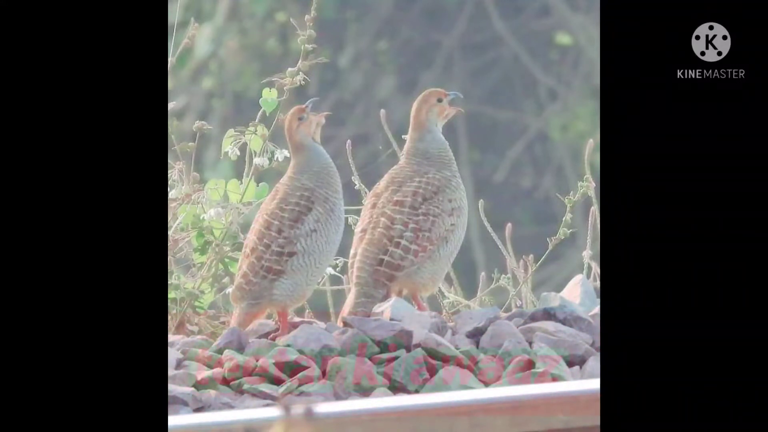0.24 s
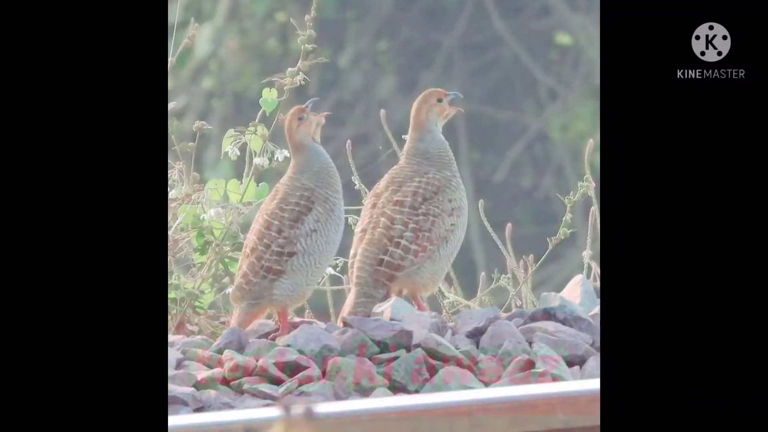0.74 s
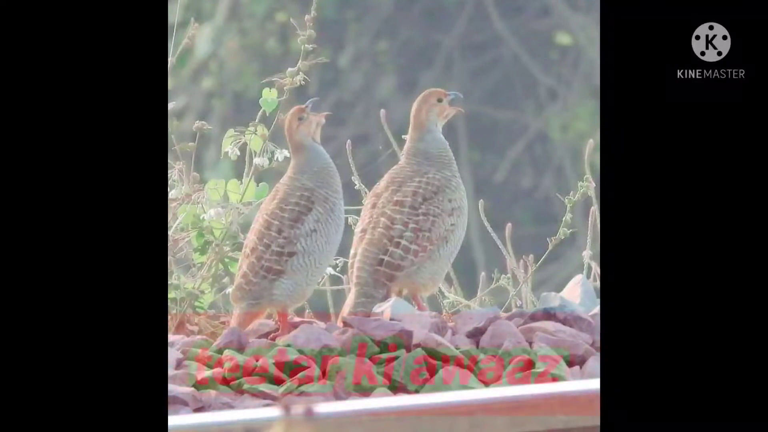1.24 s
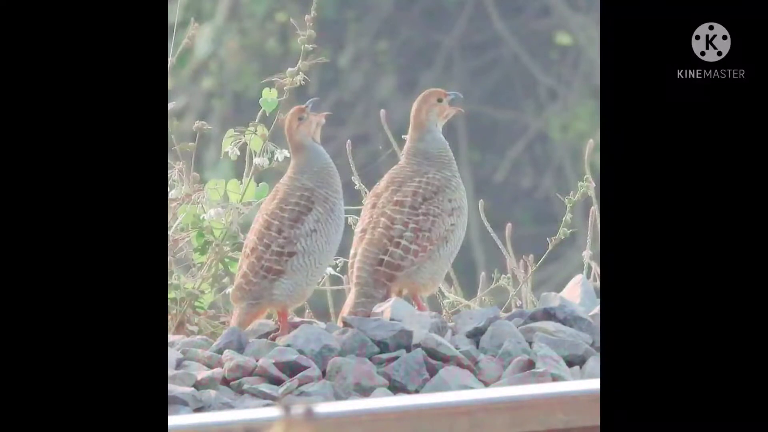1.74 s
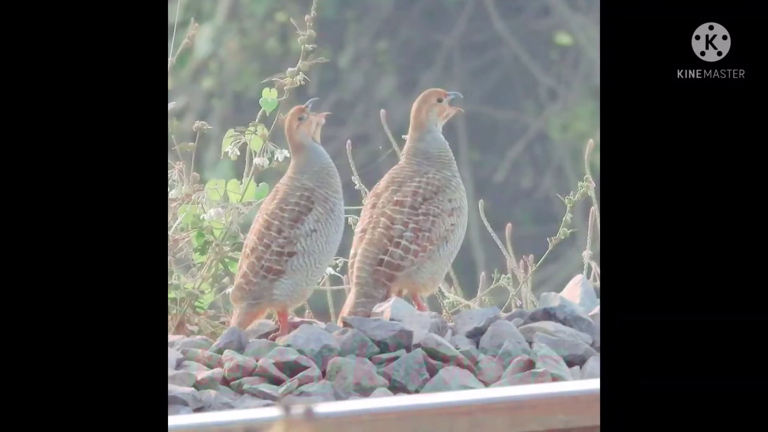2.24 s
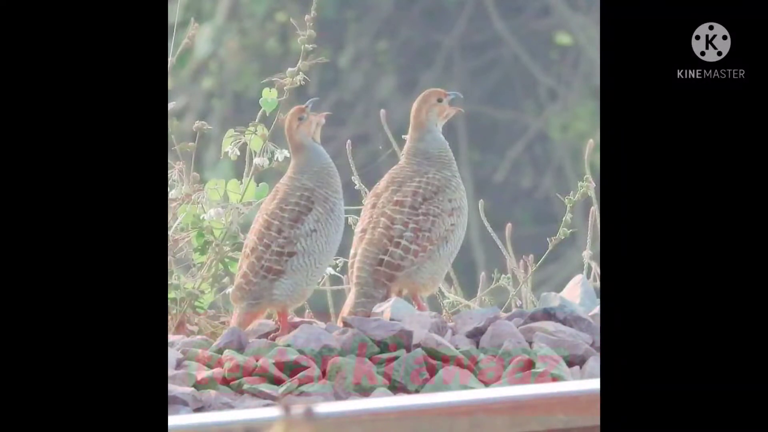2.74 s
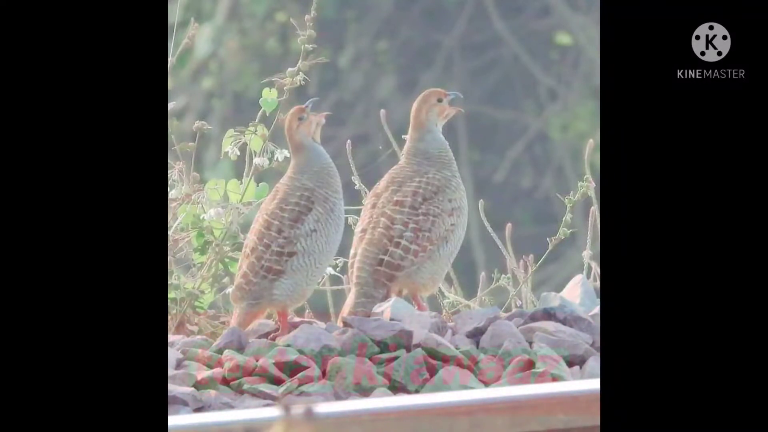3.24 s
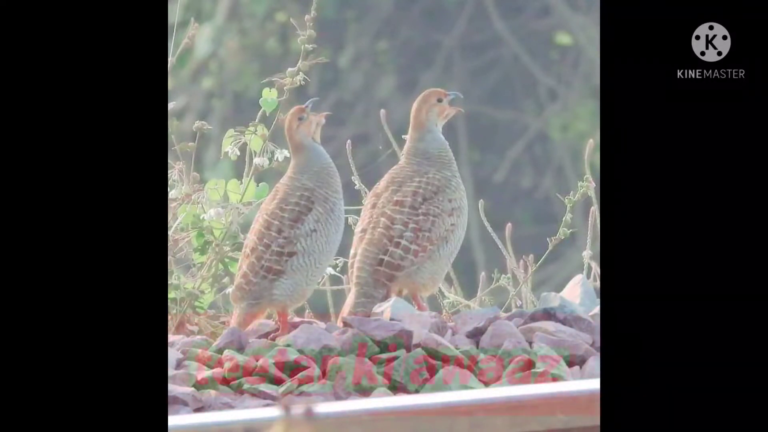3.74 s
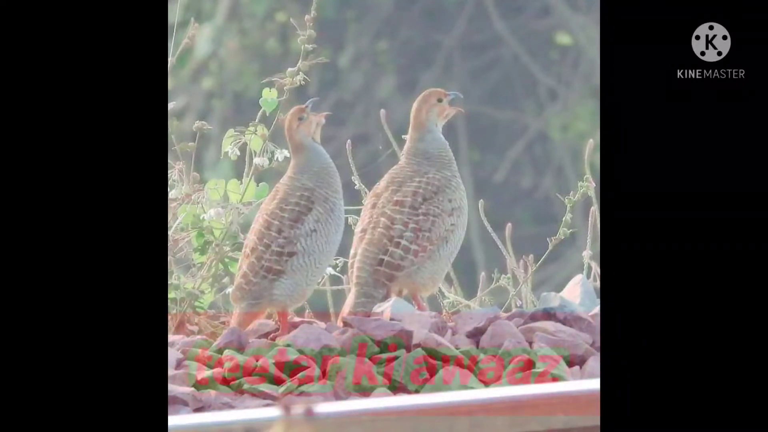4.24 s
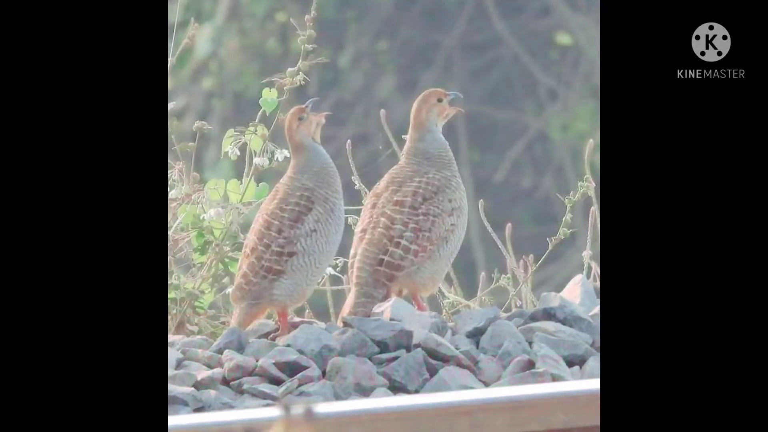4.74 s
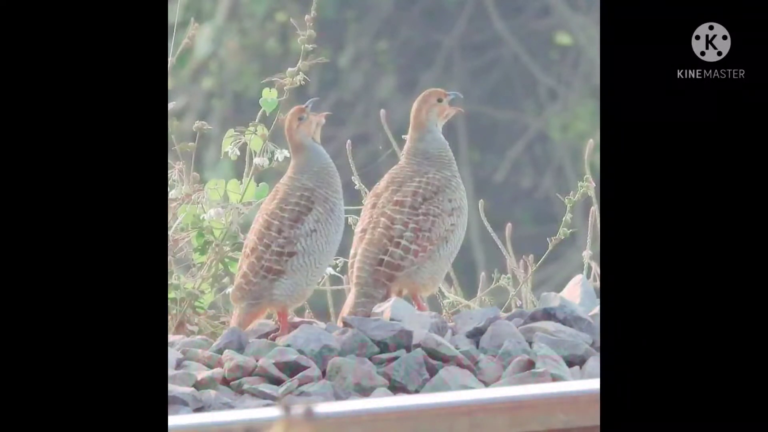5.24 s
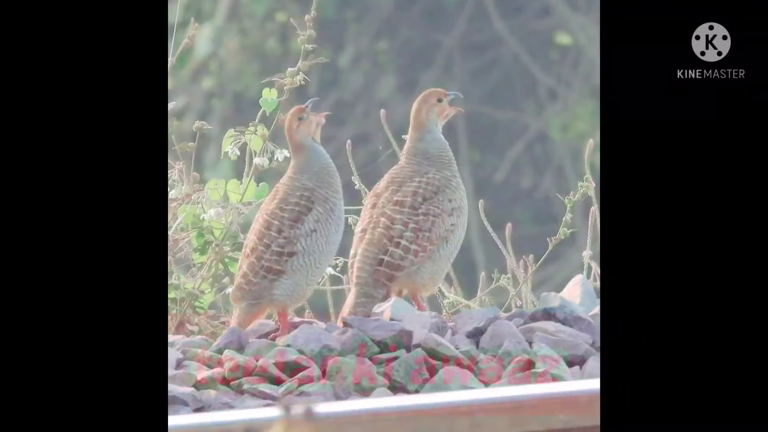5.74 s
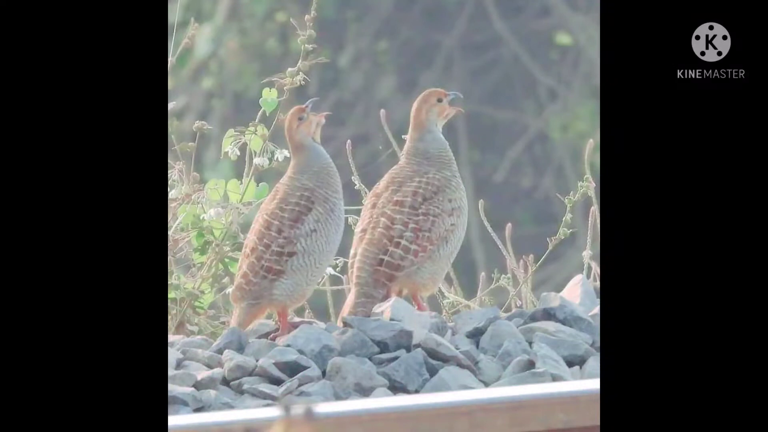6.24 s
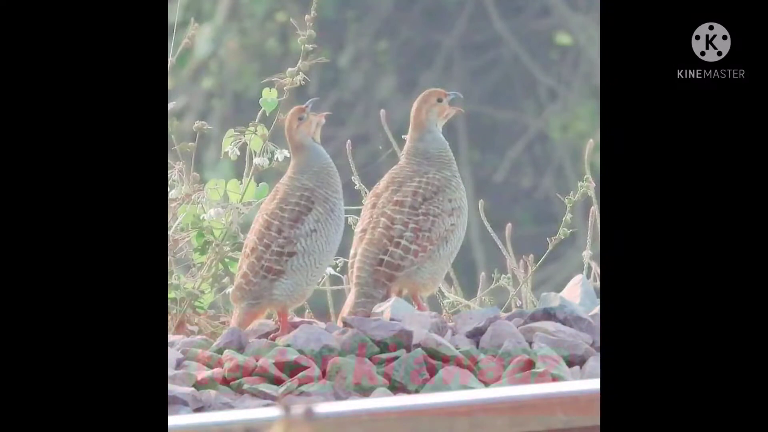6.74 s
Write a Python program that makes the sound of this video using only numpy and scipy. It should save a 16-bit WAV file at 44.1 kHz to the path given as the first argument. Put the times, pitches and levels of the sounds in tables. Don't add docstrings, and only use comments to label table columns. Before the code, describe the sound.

Continuous quick high chipping and pulsed cricket chirps fill an open field, with sharp insect calls at the start. A partridge-like bird clucks, then calls twice in piercing multi-note whistles ending in a harsh drop, with throaty clucks between and after. The rest is small far-off bird slurs, soft coos, faint knocks and a barely audible distant horn. The microphone hears the calls near, with short outdoor echoes.

```python
import sys
import numpy as np
from scipy import signal
from scipy.fft import rfft, irfft, next_fast_len
from scipy.io import wavfile
from scipy.ndimage import uniform_filter1d, map_coordinates

SR = 44100
rng = np.random.default_rng(int(sys.argv[2]) if len(sys.argv) > 2 else 0)


def gain_from_db(level_db):
    decades = np.asarray(level_db, float) / 20
    return 10 ** decades


def waveform_to_disk(signal):
    frames = np.transpose(np.atleast_2d(signal))
    scaled = np.clip(frames, -1, 1) * 32767
    samples = np.round(scaled).astype(np.int16)
    wavfile.write(sys.argv[1], SR, samples)


N = 308700

# frequency in Hz, level in dB.
CHEST_SPECTRUM = [(400, -27), (800, -14), (1150, -5), (1800, 2.5), (2500, -9), (4000, -50.5)]


def unit(x):
    return x / np.sqrt(np.mean(np.abs(x) ** 2) + 1e-20)


def along(points, hz):
    f, v = np.transpose(points)
    return np.interp(np.log(hz + 1), np.log(f + 1), v)


def curves(rows, t):
    s, *cols = np.transpose(rows)
    return [np.interp(t, s, c) for c in cols]


def clock(start, end):
    return np.arange(round(start * SR), round(end * SR)) / SR


def wobble(rate, size):
    knots = rng.standard_normal(int(size * rate / SR) + 4)
    return map_coordinates(knots, [np.arange(size) * rate / SR])


def filtered(x, response):
    m = next_fast_len(len(x) + 4096)
    return irfft(rfft(x, m) * response(np.fft.rfftfreq(m, 1 / SR)), m)[:len(x)]


def coloured(x, spectrum):
    return unit(filtered(x, lambda hz: gain_from_db(along(spectrum, hz))))


def noise(spectrum, size):
    return coloured(rng.standard_normal(size), spectrum)


def tone(hz):
    return np.sin(2 * np.pi * np.cumsum(hz) / SR)


def hump(size, edge):
    return signal.windows.tukey(size, np.clip(edge, .02, 1))


def add(track, s, x):
    at = round(s * SR)
    x = x[max(0, -at):N - at]
    track[max(0, at):][:len(x)] += x


def street():
    # start in seconds, length in seconds, level in dB.
    horn = [
        (1.409, 0.3, -76),
        (4.635, 0.11, -76),
        (4.861, 0.073, -76),
    ]
    # frequency in Hz, level in dB.
    horn_lines = [(2400, 7), (2800, 12), (3180, 12), (3290, 2)]
    # start in seconds, level in dB.
    knocks = [
        (0.622, -46.5),
        (1.12, -74),
        (5.658, -53),
        (6.04, -56),
    ]
    # frequency in Hz, level in dB.
    rumble_spectrum = [(15, -90.5), (25, -54), (37, -48.5), (52, -18.5), (84, 7), (123, -5), (177, -8.5),
                       (260, -31.5), (340, -41), (570, -120)]
    # middle in seconds, half length in seconds, level in dB.
    swells = [(0.034, 0.046, -39), (0.654, 0.038, -38), (1.246, 0.044, -43.5), (1.682, 0.081, -44),
              (2.044, 0.19, -40.5), (2.679, 0.11, -42), (3.067, 0.039, -38.5), (3.369, 0.068, -45.5),
              (3.669, 0.075, -47), (4.051, 0.12, -46), (4.322, 0.093, -44), (4.875, 0.039, -44),
              (5.18, 0.15, -48.5), (5.466, 0.1, -44.5), (5.75, 0.087, -47), (6.098, 0.053, -46),
              (6.359, 0.11, -42), (6.6, 0.071, -48), (6.847, 0.097, -48.5)]
    # frequency in Hz, level in dB.
    air = [(76, -23.5), (130, 0.5), (384, -9.5), (1330, -13.5), (2630, -20.5), (3500, -26), (4200, -47.5),
           (5000, -37)]
    # time in seconds, level in dB.
    air_course = [(0.0, -60), (1.36, -61), (2.94, -55), (3.57, -60), (7.0, -59)]
    # frequency in Hz, level in dB.
    hiss = [(3000, -7), (5000, -12.5), (6120, -15.5), (7470, -0.5), (8600, -22.5), (9320, -4),
            (9900, -18.5), (12000, -15), (14800, -9), (15700, -1.5)]
    knock_spectrum = [(300, -23), (1100, 12.5), (2500, 3), (6000, -8), (12000, -24.0)]  # Hz, dB
    idle_db = -51.5
    out, t = np.zeros(N), clock(0, N / SR)
    for s, length, db in horn:
        u = clock(0, length)
        blast = sum(gain_from_db(db + d + 1.7 * wobble(26, len(u))) * tone(hz + 0 * u) for hz, d in horn_lines)
        add(out, s, hump(len(u), 0.12) * blast)
    for s, db in knocks:
        u = clock(0, 0.036)
        add(out, s, gain_from_db(db - 60 * u / 0.096) * noise(knock_spectrum, len(u)))
    rumble = noise(rumble_spectrum, N)
    rumble /= np.sqrt(np.abs(uniform_filter1d(rumble ** 2, SR // 16)) + 0.66)
    passing = sum(gain_from_db(2 * db) * np.exp(-((t - s) / half) ** 2) for s, half, db in swells)
    rumble *= np.sqrt(gain_from_db(2 * idle_db) + passing)
    patches = gain_from_db(.6 * wobble(3, N) + .7 * wobble(12, N))
    wash = gain_from_db(curves(air_course, t)[0] + 7.5) * patches * noise(air, N)
    return out + gain_from_db(-59.0) * noise(hiss, N) + gain_from_db(2.5) * rumble + wash


def far_birds():
    # start in seconds, length in seconds, first and last frequency in Hz, level in dB.
    sagging = [(.076, 0.036, 3300, 2000, -48), (5.435, .031, 2440, 1900, -46),
               (6.33, 0.065, 3650, 2620, -59), (6.735, .12, 3750, 2650, -57),
               (4.062, .022, 3800, 1950, -48), (4.238, .026, 3700, 2000, -48),
               (4.448, .02, 3700, 1950, -50), (4.262, .02, 4300, 3100, -53)]
    # seconds, seconds, Hz, Hz, dB.
    arched = [(.928, 0.11, 2400, 2970, -58), (1.337, 0.075, 2750, 1900, -58.5),
              (.926, 0.0404, 1600, 1280, -44), (.922, .02, 1780, 1980, -51.5),
              (4.6, 0.038, 1980, 2250, -56), (5.114, .054, 2080, 1860, -55), (5.39, 0.048, 3700, 3300, -61),
              (6.28, .052, 5050, 3700, -64)]
    # seconds, seconds, Hz, Hz, dB. Those near 2.24, 2.84, 2.87 and 3.21
    # s are late echoes of the game birds' notes.
    straight = [(.053, .021, 3730, 3220, -49), (.635, .05, 2320, 1800, -60), (.897, .15, 2796, 2820, -60),
                (1.04, .062, 2750, 2330, -54), (1.112, .012, 2400, 1950, -59), (1.15, .05, 3000, 3220, -62),
                (1.259, .052, 3010, 3210, -58), (2.87, .06, 2880, 2840, -44), (3.21, .022, 2860, 2860, -50),
                (4.01, .021, 1920, 2450, -52), (4.031, .021, 3200, 2550, -56),
                (4.181, .019, 2750, 3550, -56), (4.394, .027, 2400, 3850, -55),
                (4.432, .011, 3840, 3300, -56), (5.055, .05, 2500, 1970, -60),
                (5.187, .026, 2780, 2250, -53), (5.752, .04, 1597, 1810, -50),
                (5.778, .019, 1280, 1450, -51), (6.56, .068, 2000, 3350, -56),
                (6.905, .058, 2520, 3120, -60), (4.057, .012, 2950, 1950, -54),
                (4.004, .02, 3000, 3350, -58), (4.15, .03, 2320, 2050, -58), (6.515, .035, 1800, 2120, -60),
                (6.98, .02, 1750, 1700, -56), (2.238, .03, 2190, 2200, -37), (2.838, .026, 2420, 2400, -34)]
    # start in seconds, length in seconds.
    dove = [
        (4.423, 0.16),
        (4.598, 0.23),
        (5.195, 0.23),
        (5.762, 0.079),
        (5.873, 0.15),
        (6.542, 0.37),
        (6.792, 0.1),
    ]
    # start of the last note in seconds, its level in dB.
    trills = [
        (.99, -63),
        (1.87, -62.5),
        (4.285, -62.5),
        (5.68, -63.5),
        (6.722, -60),
    ]
    out, t = np.zeros(N), clock(0, 0.021)
    for slurs, bend_hz_per_s in (sagging, -3600), (arched, 4400), (straight, 0):
        for s, length, first_hz, last_hz, db in slurs:
            u = np.linspace(0, 1, round(length * SR))
            bend = bend_hz_per_s * length * np.sin(np.pi * u)
            hz = first_hz + (last_hz - first_hz) * u + bend
            flutter = gain_from_db(2.5 * wobble(120, len(u)) - .005 * np.clip(hz - 2900, 0, 900))
            whistle = tone(hz + 22 * wobble(250, len(u)))
            add(out, s, gain_from_db(db) * flutter * hump(len(u), .3) * whistle)
    for s, length in dove:
        u = clock(0, length)
        coo = gain_from_db(-62 + 2.5 * wobble(30, len(u))) * hump(len(u), .7)
        add(out, s, coo * tone(610 + 25 * wobble(11.9, len(u))))
    for s, db in trills:
        for k in range(9):
            start = s - .011 - k * .0425 + k * k * .0011
            level = gain_from_db(db - 1.1 * k + rng.normal(0, 1.5))
            add(out, start, level * hump(len(t), 0.88) * tone(4620 - 16000 * t))
    return out


def buzzes():
    buzz_middles = [0.126, 0.449, .84, 1.33, 1.64, 2.39, 3.17, 3.645, 3.955, 4.37, 4.694, 5.1, 5.434, 5.775,
                    6.401, 6.78]
    out, t = np.zeros(N), clock(0, 0.0038)
    for s in buzz_middles:
        for k in range(-10, 10):
            tick = hump(len(t), 0.64) * tone(rng.normal(6920, 120) - 250000 * t)
            level = gain_from_db(-53 - 9.8 * (k / 10) ** 2 + rng.normal(0, 2.73))
            add(out, s + k * .0052, level * tick)
    return out


def crickets():
    # start in seconds, number of chirps.
    near_chirps = [(.191, 2), (.455, 2), (.885, 3), (1.161, 3), (1.421, 2), (1.635, 3), (2.251, 2),
                   (2.477, 2), (3.138, 2), (3.33, 3), (3.634, 4), (3.964, 3), (4.245, 4), (4.697, 2),
                   (4.96, 2), (5.161, 3), (5.425, 2), (5.658, 2), (5.869, 2), (6.093, 2), (6.306, 3),
                   (6.585, 2), (6.813, 2)]
    # start in seconds, number of chirps.
    far_chirps = [(.29, 1), (.77, 1), (1.03, 1), (1.4, 1), (1.78, 3), (2.35, 3), (2.92, 1), (3.05, 2),
                  (3.247, 2), (3.45, 2), (3.65, 3), (3.848, 3), (4.131, 3), (4.385, 3), (4.631, 3),
                  (4.815, 1), (4.874, 2), (5.104, 2), (5.358, 4), (5.6, 2), (5.78, 2), (5.86, 3),
                  (6.092, 3), (6.347, 3), (6.618, 3), (6.914, 2)]
    # start in seconds, level in dB.
    tweets = [
        (0.011, -33.5),
        (0.389, -37.5),
        (0.673, -39.5),
    ]
    gap_s, slows_s, far_gap_s = .045, .0023, .0495
    strokes = (-.027, -7, 9020), (-.0125, 1.5, 9150), (0, 3.5, 9090)
    out, t, far, call = np.zeros(N), clock(0, 0.014), clock(0, .018), clock(0, 0.019)
    for s, chirps in near_chirps:
        for k in range(chirps):
            db = rng.normal(-54.5, 0.83)
            start = s + k * gap_s + k * (k - 1) * slows_s
            for lag, stroke_db, hz in strokes:
                pulse = hump(len(t), 0.44) * tone(hz + 4000 * t + 45 * wobble(150, len(t)))
                add(out, start + lag, gain_from_db(db + stroke_db) * pulse)
    for s, chirps in far_chirps:
        for k in range(chirps):
            level = gain_from_db(rng.normal(-62.5, 1.5) + 1.5 * wobble(200, len(far)))
            add(out, s + k * far_gap_s - .006, level * hump(len(far), .7) * tone(9520 - 9000 * far))
    for s, db in tweets:
        level = gain_from_db(db + 2.3 * wobble(205, len(call)))
        falling = tone(9120 - 600 * (call / call[-1]) ** 4)
        add(out, s, level * hump(len(call), 0.26) * falling)
    return out


def warbler():
    # time in seconds, count of pairs sung so far.
    reel = [(0.0266, 0), (0.4137, 6), (0.499, 7), (1.4673, 22), (1.7341, 26), (2.2498, 34), (3.288, 50),
            (3.7366, 57), (4.7081, 72), (5.3655, 82), (6.0103, 92), (6.9811, 107)]
    # time in seconds, level in dB.
    reel_course = [(0, -36), (2, -35), (3, -33.5), (4, -35), (7, -33.5)]
    # time in seconds, frequency in Hz, level in dB.
    chip = [(-.006, 8690, -28), (-.004, 8096, -7), (-.0023, 7885, -14), (-.0008, 7500, -1.5),
            (.001, 7040, -18), (.0035, 6504, -14), (.0055, 5855, -23), (.007, 5620, -47.5)]
    out, t = np.zeros(N), clock(chip[0][0], chip[-1][0])
    hz, db = curves(chip, t)
    times, counts = np.transpose(reel)
    for s in np.interp(np.arange(round(counts[-1]) + 1), np.round(counts), times):
        for lag in 0, .0204:
            level = gain_from_db(db + curves(reel_course, s)[0] + rng.normal(0, 1.1))
            add(out, s + lag + t[0], level * tone(hz * rng.normal(1, 0.0032)))
    return out


def clucks():
    # start in seconds, level in dB, time to fall 60 dB in seconds, top pitch in Hz,
    # first mouth resonance in Hz.
    cluck_events = [
        (1.614, -33, 0.16, 382.3, 1950),
        (2.307, -26, .08, 495.8, 2300),
        (2.418, -38.5, 0.056, 381, 1800),
        (2.924, -19, 0.078, 635, 2650),
        (3.035, -21.5, 0.053, 580.4, 2000),
        (3.136, -33, 0.087, 414, 1600),
        (3.24, -43.5, .075, 373, 1300),
        (5.195, -28.5, 0.12, 381.3, 2050),
    ]
    # centre in Hz, width in Hz, level in dB.
    gullet_modes = [(790, 330, -6.5), (1080, 320, -1), (1508, 60.7, 4), (1902, 91, 4), (2570, 300, 0),
                    (3320, 880, -0.5)]
    # frequency in Hz, level in dB.
    breath_spectrum = [(600, -13), (3000, -3), (8000, 7.5), (13000, -17.5)]
    start_ratio, sag_ratio, sag_s = .5, .8, .05
    mouth_sag, mouth_sag_s = .62, .058
    below_db, above_db, skirt_db = 17.5, 74.5, -20
    rise_base_s, hold_s, chest_late_s = .016, .014, .049

    def gullet(f):
        return sum((-1) ** k * gain_from_db(db) * 1j * f * w / (c * c - f * f + 1j * f * w)
                   for k, (c, w, db) in enumerate(gullet_modes))

    out, t = np.zeros(N), clock(0, 0.21)
    for s, db, t60, top_hz, mouth_hz in cluck_events:
        rise = rise_base_s * (1 + top_hz / 650)
        rough = gain_from_db((db + 25) * .3)
        climb = 1 - (1 - start_ratio) * np.maximum(1 - t / rise, 0) ** 1.3
        sag = sag_ratio + (1 - sag_ratio) * np.exp(-(np.maximum(t - rise, 0) / sag_s) ** 2)
        smooth_hz = top_hz * climb * sag
        hz = smooth_hz * (1 + .028 * rough * wobble(300, len(t)))
        mouth = mouth_hz * (mouth_sag + (1 - mouth_sag) * np.exp(-(t / mouth_sag_s) ** 2))
        octaves = np.log2(np.arange(1, 10)[:, None] * smooth_hz / mouth)
        loss_db = np.where(octaves < 0, below_db, above_db) * octaves ** 2
        gains = gain_from_db(np.maximum(-loss_db, skirt_db - 6 * octaves))
        voice = sum(g * (1 + .7 * rough * wobble(500, len(t))) * tone((k + 1) * hz) for k, g in enumerate(gains))
        breath = 0.23 * gain_from_db((db + 27.0) * 1.1 - 130.0 * t) * noise(breath_spectrum, len(t))
        hoarse = 0.73 * rough * wobble(900, len(t)) * tone(mouth)
        chest = 0.26 * np.minimum(t / chest_late_s, 1) ** 2 * noise(CHEST_SPECTRUM, len(t))
        throb = gain_from_db(1.65 * rough * tone(135 + 25 * wobble(60, len(t))))
        onset = np.minimum(t / rise, 1) ** 2
        swell = onset * gain_from_db(-60 * np.maximum(t - rise - hold_s, 0) / t60)
        source = throb * (.6 * voice + hoarse + chest + breath)
        add(out, s, gain_from_db(db) * swell * 1.13 * filtered(source, gullet))
    return out


def squeaks(size, rate, life):
    count, t = int(rate * size / SR), clock(0, life)
    at, pitch, sag, level = rng.random((count, 4)).T[..., None]
    hz = 400 + 15000 * pitch ** 1.6
    cycles = hz * t * (1 - 1.9 * (sag - .3) * t)
    grain = gain_from_db(11 * level) * np.hanning(len(t)) * np.sin(2 * np.pi * cycles)
    index = (at * size).astype(int) + np.arange(len(t))
    summed = np.bincount(index.ravel(), grain.ravel())
    return unit(summed[len(t) // 2:][:size - len(t)])


def beats(size, hz):
    cycles = np.cumsum(hz * (1 + .065 * wobble(250, size))) / SR
    pulses = np.exp(14 * np.cos(2 * np.pi * cycles))
    return unit(pulses * gain_from_db(2.2 * wobble(900, size)))


def rasp():
    # frequency in Hz, level in dB.
    throat = [(1200, -32), (1700, -12), (2200, -3.5), (3400, 3), (4300, -8.5), (5500, -12), (7000, -12),
              (9000, -52.5)]
    beak = [(3500, -27.5), (5000, -6.5), (6500, -11.5), (8300, 1), (9500, -11), (12000, -28.5),
            (15500, -23)]
    # start in seconds, length in seconds, effort in dB, beak opening in dB.
    open_bursts = [
        (1.917, .086, -39.5, 0.5),
        (2.558, .07, -37.5, 2),
    ]
    leak_bursts = [
        (2.004, 0.073, -53, 7.5),
        (2.632, .055, -51.5, 4),
    ]
    shut_bursts = [
        (2.054, .053, -35.5, -17),
        (2.68, .04, -29.5, -10),
    ]
    hard_bursts = [
        (2.106, .055, -27, -9.5),
        (2.719, .05, -25, -9),
    ]
    # attack in seconds, release in seconds, end over start in dB,
    # bulge in the middle in dB.
    burst_shapes = [
        (0.013, .013, 6, -4.5),
        (.005, .005, -5, 0.5),
        (0.01, .006, 2.5, 0.5),
        (0.0053, .055, -3.5, -1.5),
    ]
    out = np.zeros(N)
    kinds = (open_bursts, leak_bursts, shut_bursts, hard_bursts)
    for bursts, (attack, release, end_db, bulge_db) in zip(kinds, burst_shapes):
        for s, length, db, open_db in bursts:
            t = clock(0, length + release)
            corners = [0, attack, length / 2, length, length + release]
            effort_db = db + np.interp(t, corners, [-25, 0, end_db / 2 + bulge_db, end_db, end_db - 22])
            source = squeaks(len(t) + 1000, rate=5000, life=.01)[:len(t)]
            source = source + .45 * rng.standard_normal(len(t))
            if open_db < 0:
                source = source + .9 * beats(len(t), hz=1150)
            else:
                source = source + .7 * beats(len(t), hz=1340)
            mix = gain_from_db(3.0) * coloured(source, throat)
            mix = mix + gain_from_db(open_db - 0.5) * coloured(source, beak)
            mix = mix + gain_from_db(-14.5 - 0.41 * open_db) * coloured(source, CHEST_SPECTRUM)
            add(out, s, gain_from_db(effort_db + 1.5 * wobble(305, len(t))) * mix)
    return out


def notes():
    # start in seconds, length in seconds, first and last frequency in Hz, level in dB.
    cracks = [
        (2.046, 0.02, 8420, 7790, -25.5),
        (2.688, 0.017, 8560, 8020, -27),
    ]
    # start in seconds, length in seconds, top frequency in Hz,
    # fundamental level in dB.
    sung_calls = [
        [(1.927, 0.044, 2633, -34), (1.999, 0.07, 2828, -15), (2.108, 0.035, 2371, -19),
         (2.152, 0.022, 2226, -16.5), (2.174, 0.038, 2224, -20)],
        [(2.571, 0.036, 2795, -25.5), (2.624, 0.098, 2873, -13), (2.724, 0.029, 2446, -13),
         (2.76, 0.027, 2438, -12.5), (2.789, 0.044, 2355, -14.5)],
    ]
    # share of the length, pitch over its top,
    # effort in dB, beak opening in dB.
    lead_shape = [(0, .88, -18.5, -12.5), (.25, 1, -11, -4), (.45, 0.99, 1.5, 0), (.62, 1, -4.5, -1.5),
                  (.8, .81, -15.5, -9.5), (1, .79, -19.5, -14.5)]
    long_shapes = [
        [(0, .99, -26, -6), (.12, 1.004, -4.5, -5.5), (.25, 1, -0.5, -2.5), (.45, 1, 0.5, -3.5),
         (.66, .996, -13, -1.5), (.76, .99, -7, 2), (.81, .99, -26, -5), (.87, .99, -1, -17),
         (1, .985, -17, -25)],
        [(0, 1, -19.5, -8), (.1, 1.004, -7, -5), (.28, 1, 1.5, 0.5), (.38, .998, -1.5, 1), (.45, .996, -12, -4),
         (.74, .99, -5, -5), (.8, .99, -13, -16.5), (1, .995, -12, -21)],
    ]
    short_shape = [(0, 0.98, -17.5, -18.5), (.22, 1, -3.5, -10), (.5, 1, 1.5, -1.5), (.76, .992, -5, 1),
                   (1, 0.99, -12, -12.5)]
    held_shapes = [
        [(0, 0.94, -12.5, -13), (.3, 0.99, -8, -3), (.8, 1, 0.5, -1), (1, .998, -2, 0)],
        [(0, 1, -16, -6), (.25, 1.003, 0.5, -3), (.7, .99, -1, -0.5), (1, .97, -2, -1)],
    ]
    drop_shapes = [
        [(0, 1, 2, 5), (.14, 0.95, -1.5, -5), (.32, .845, 1.5, -20), (.55, 0.84, -4.5, -27),
         (.78, .71, -14, -27), (1, .68, -24, -27)],
        [(0, 1, -4.5, 2), (.16, .975, -5.5, 2.5), (.36, .895, -4, -2), (.62, .8, -5.5, -21.5),
         (.78, .8, -13, -22), (1, 0.73, -19, -25)],
    ]
    # second, third, fourth and fifth partial in dB.
    overtone_levels = [
        [(-32.5, -31.5, -46.5, -63), (-33.5, -32, -55.5, -56), (-34, -28, -44.5, -58), (-32.5, -25, -54, -54),
         (-44, -34, -44, -61)],
        [(-32.5, -25, -48.5, -58), (-34, -43, -54, -53), (-30.5, -27.5, -37.5, -47.5),
         (-28, -31.5, -44.5, -56.5), (-36, -31, -47.5, -68)],
    ]
    lag_s, lag_level_db, lag_depth = (0.0129, 0.01185), (-1.5, 2.5), 0.693
    out = np.zeros(N)
    for s, length, first_hz, last_hz, db in cracks:
        u = clock(0, length) / length
        add(out, s, gain_from_db(db) * hump(len(u), .7) * tone(first_hz + (last_hz - first_hz) * u ** 2))
    by_call = zip(sung_calls, long_shapes, held_shapes, drop_shapes, overtone_levels, lag_s, lag_level_db)
    for call, long, held, drop, colours, lag, lag_db in by_call:
        shapes = (lead_shape, long, short_shape, held, drop)
        for (s, length, top_hz, db), shape, overtones in zip(call, shapes, colours):
            t = clock(-.0015, length + .0015)
            ratio, effort_db, open_db = curves(shape, t / length)
            hz = top_hz * ratio
            fall = uniform_filter1d(np.maximum(-np.gradient(hz) * SR, 0), size=200) * (hz < 2250)
            hz = hz + (10 + .0005 * fall) * wobble(450, len(t))
            voice = gain_from_db(db + effort_db) * tone(hz)
            for k, overtone_db in enumerate(overtones):
                level = gain_from_db(open_db + 2 + overtone_db + 1.5 * wobble(90.6, len(t)))
                voice = voice + level * tone((k + 2) * hz)
            if shape is drop:
                late_ratio, late_db, _ = curves(shape, (t - lag) / length)
                late_level = gain_from_db(db + lag_db + late_db) * np.clip(t / lag, 0, 1)
                voice = voice + late_level * tone(top_hz * late_ratio ** lag_depth)
            fade = hump(len(t), .006 * SR / len(t))
            add(out, s + t[0], np.sqrt(2) * fade * voice)
    return out


def echoes(x, scrub_db):
    # frequency in Hz, time to fall 60 dB in seconds.
    scrub = [(500, 0.1), (2500, 0.27), (9000, 0.2)]
    # delay in seconds, level in dB.
    banks = [
        (.013, -13),
        (.022, -16.5),
        (.08, -25),
    ]
    hz, t, z = signal.stft(rng.standard_normal(SR // 2), SR, nperseg=256)
    decay = gain_from_db(-60 * t / along(scrub, hz)[:, None])
    tail = signal.istft(z * decay, SR, nperseg=256)[1]
    delayed = np.pad(x, (200, 0))
    out = x + gain_from_db(scrub_db) * signal.fftconvolve(delayed, tail / np.linalg.norm(tail))[:N]
    for delay, db in banks:
        add(out, delay, gain_from_db(db) * x)
    return out


def scene():
    fowl = echoes(notes() + rasp(), scrub_db=-10.0) + echoes(clucks(), scrub_db=-10.5)
    small = echoes(warbler(), scrub_db=-10.5)
    small = small + echoes(crickets() + buzzes(), scrub_db=-11.5)
    small = small + echoes(far_birds(), scrub_db=-11)
    return (fowl + small + street())[None]


def low_pass(x):
    return signal.sosfilt(signal.butter(12, 16300, fs=SR, output="sos"), x)


def record(dry):
    mix = filtered(dry[0], lambda hz: hz < 15640)[None]
    return low_pass(mix)


dry = scene()
out = record(dry)
waveform_to_disk(out)
```